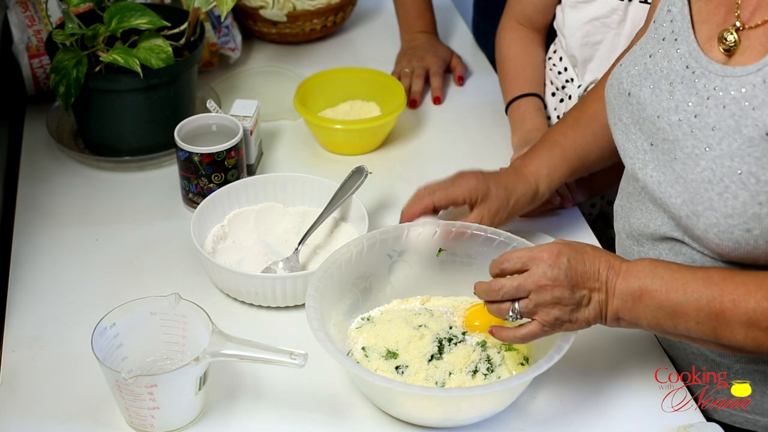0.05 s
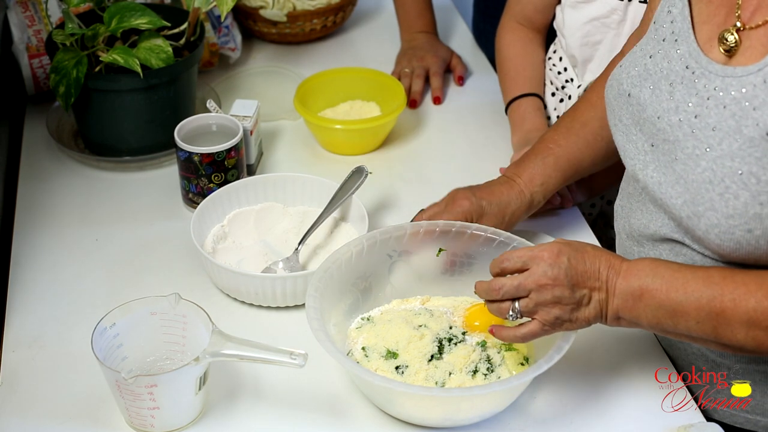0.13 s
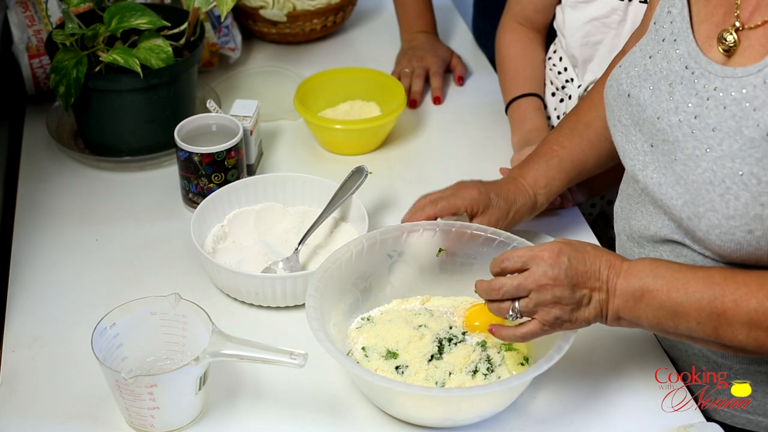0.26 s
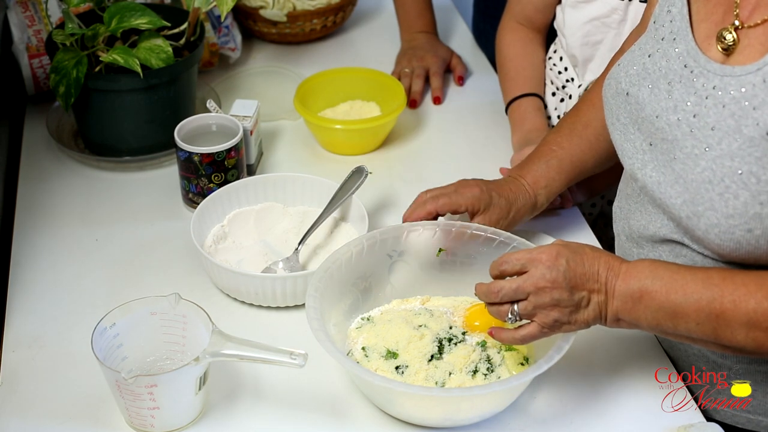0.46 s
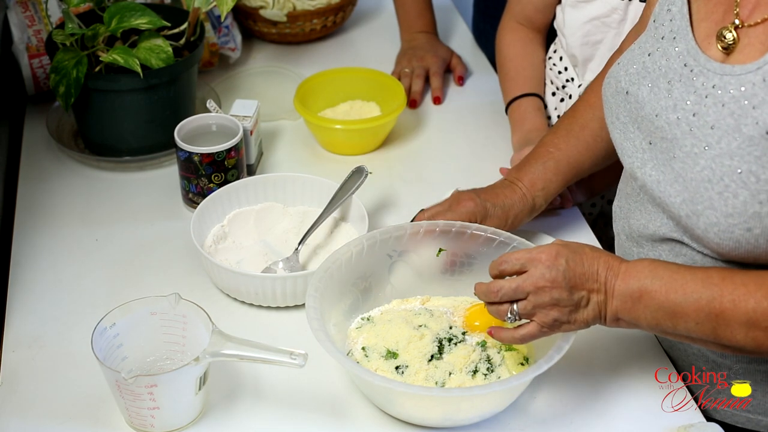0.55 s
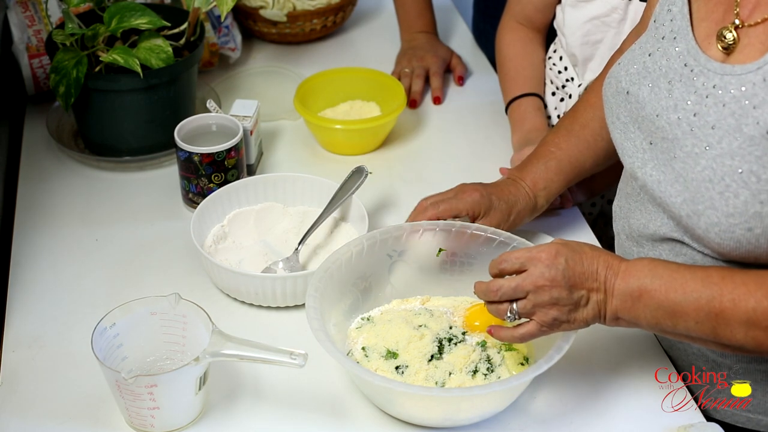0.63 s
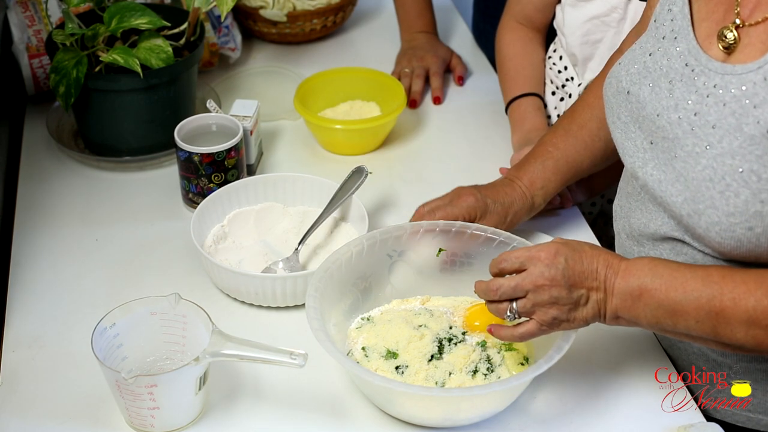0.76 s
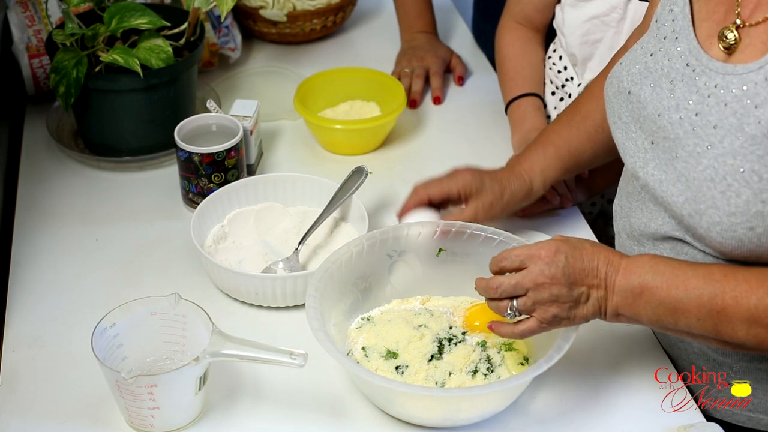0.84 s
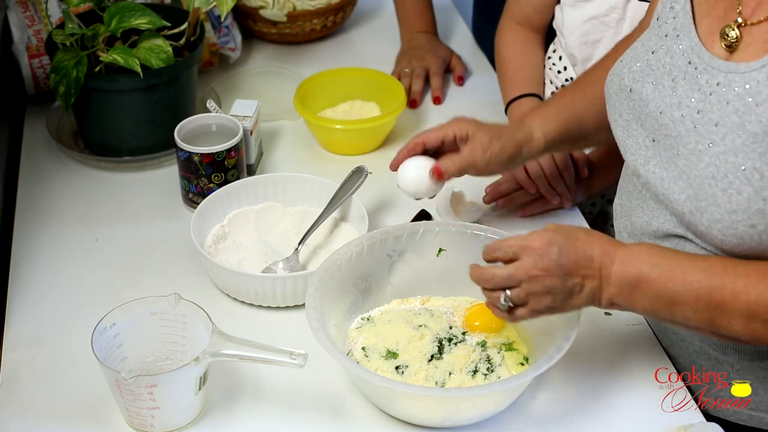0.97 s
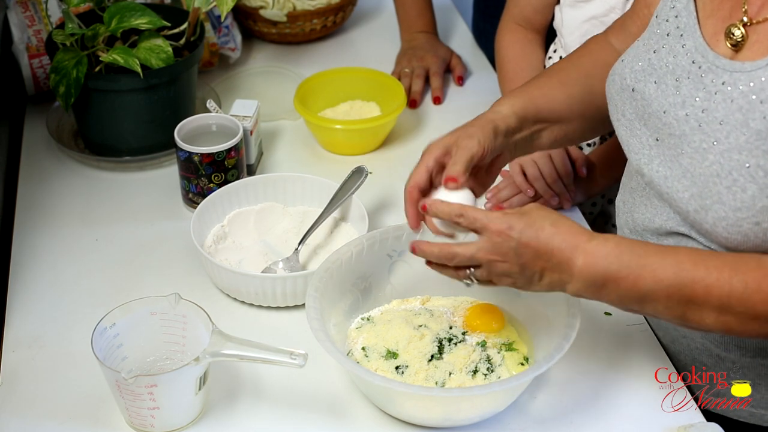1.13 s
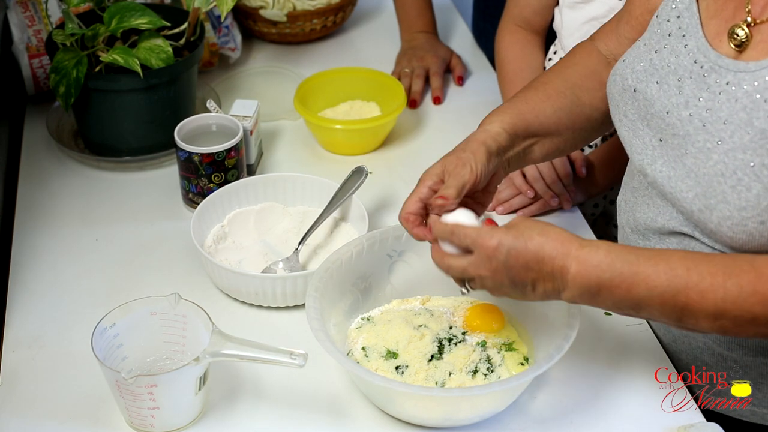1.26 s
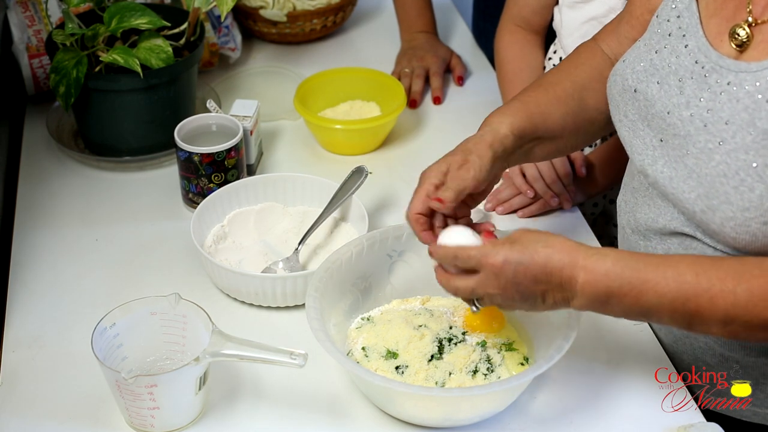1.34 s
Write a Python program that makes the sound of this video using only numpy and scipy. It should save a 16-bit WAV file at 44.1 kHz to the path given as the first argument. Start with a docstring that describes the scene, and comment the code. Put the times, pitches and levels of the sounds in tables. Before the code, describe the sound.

An egg cracks sharply on a hard edge, then three lighter knocks in a quiet kitchen

```python
"""Egg knocked on a hard edge

One sharp crack and three lighter knocks at a kitchen table, over a low room rush with faint hum lines.
Each blow is a few milliseconds of grainy shell noise with a small room's tail, plus decaying sines for
the egg, the ringing edge and the table top; the first also sways the table. Short noise bursts tick as
shell, one before the crack and the rest after the knocks, and a very low sine swells as the hand lifts."""
import sys
import numpy as np
from scipy import signal
from scipy.fft import rfft, irfft, next_fast_len
from scipy.io import wavfile
from scipy.ndimage import uniform_filter1d

SR = 44100
rng = np.random.default_rng(int(sys.argv[2]) if len(sys.argv) > 2 else 0)


def to_wav(sig):
    """Store sig (one row per channel, or 1-D mono) as 16-bit WAV at the path in sys.argv[1].

    Samples outside -1..1 are clipped; the rate is SR.
    """
    pcm = np.clip(np.atleast_2d(sig), -1, 1) * 32767
    pcm = np.round(pcm).astype(np.int16)
    wavfile.write(sys.argv[1], SR, pcm.T)  # frames by channels


N = 61739
T = np.arange(N) / SR   # time in seconds


def from_db(db):
    """Decibels to gain."""
    return 10 ** (np.asarray(db) / 20)


def rms_one(x):
    """Scale to unit rms."""
    return x / np.sqrt(np.mean(x ** 2) + 1e-20)


def at_hz(points, hz):
    """Read a table of (Hz, value) along a log-frequency axis."""
    table_hz, value = np.transpose(points)
    return np.interp(np.log(hz), np.log(table_hz), value)


def since(start):
    """Seconds since a moment, zero before it."""
    return np.maximum(T - start, 0)


def dying(age, t60):
    """Exponential decay that falls 60 dB in t60 seconds."""
    return from_db(-60 * age / t60)


def band_noise(low, high):
    """Noise between two frequencies, rms 1."""
    sos = signal.butter(3, [low, min(high, .45 * SR)], "band", fs=SR, output="sos")
    return rms_one(signal.sosfilt(sos, rng.standard_normal(N)))


def ring(start, hz, t60):
    """One mode struck at a given moment: a sine that dies away exponentially."""
    age = since(start)
    return np.sin(2 * np.pi * hz * age) * dying(age, t60)


MODE_SCATTER_DB, LONGEST_RING_S = 2.5, .26


def struck(modes, start):
    """All modes of a body, alternating in sign, with new strengths for each blow."""
    out = np.zeros(N)
    for k, (hz, db, t60) in enumerate(modes):
        strength = from_db(db + MODE_SCATTER_DB * rng.standard_normal())
        out += (-1) ** k * strength * ring(start, hz, min(t60, LONGEST_RING_S))
    return out


# Spectrum of the room's rush. Each row: frequency in Hz, relative density in dB per Hz.
RUSH_SPECTRUM = [(20, -0.5), (40, -2.5), (91, -6.5), (142, -8), (182, -1.5), (210, -7), (248, -0.5),
                 (340, -5.5), (422, -10.5), (470, -9), (698, -17.5), (949, -19.5), (1300, -22.5),
                 (2000, -31), (3500, -36.5), (5500, -38.5), (9000, -38.5), (16000, -41)]
RUSH_DB = -59   # rms
# Steady hum lines. Each row: frequency in Hz, level in dB rms.
HUM_LINES = [(177.6, -75), (339.1, -69), (463.0, -70.5)]


def room_tone():
    """Steady rush of shaped noise, with a few faint sines as hum."""
    hz = np.maximum(np.fft.rfftfreq(N, 1 / SR), 1)
    spectrum = rfft(rng.standard_normal(N)) * from_db(at_hz(RUSH_SPECTRUM, hz))
    rush = rms_one(irfft(spectrum, N))
    hum = np.zeros(N)
    for line_hz, db in HUM_LINES:
        hum += np.sqrt(2) * from_db(db) * np.sin(2 * np.pi * (line_hz * T + rng.random()))
    return from_db(RUSH_DB) * rush + hum


# Faint snaps of shell.
# Each row: start in seconds, level in dB, centre pitch in Hz, width in octaves, fall to 1/e in seconds.
SHELL_TICKS = [(0.027, -62, 3890, 0.28, 0.0013), (0.992, -64.5, 12000, 0.61, .001),
               (1.035, -55, 8700, 0.53, 0.0031), (1.044, -61.5, 8000, 1.0, 0.0076),
               (1.079, -67.5, 8820, 1.2, 0.0035), (1.185, -55.5, 4450, 0.95, 0.00085),
               (1.231, -63, 9000, .6, 0.0011), (1.2405, -46, 2182, 0.85, 0.0004),
               (1.241, -52, 7530, 0.82, 0.0005), (1.258, -63.5, 2480, 0.84, 0.0012),
               (1.275, -71, 2500, 0.68, 0.0023), (1.3186, -57, 3100, 0.33, 0.0015),
               (1.318, -53.5, 6940, 1.3, 0.00074), (1.326, -56.5, 6600, 0.61, 0.0017)]
TICK_ROOM_DB, TICK_T60_S = -30, 0.18


def shell_ticks():
    """Tiny snaps of shell under the fingers: bursts of band noise, each with a faint room tail."""
    out = np.zeros(N)
    for start, db, hz, octaves, fall in SHELL_TICKS:
        age = since(start)
        room = from_db(TICK_ROOM_DB) * dying(age, TICK_T60_S)
        envelope = (T > start) * (np.exp(-age / fall) + room)
        half_width = 2 ** (octaves / 2)
        out += from_db(db) * envelope * band_noise(hz / half_width, hz * half_width)
    return out


CRUNCH_RISE_S, CRUNCH_HOLD_S, CRUNCH_FALL_S = .0025, .0036, 0.004


def burst(start):
    """Envelope of the shell giving way: rise, hold, fall."""
    rise = np.minimum(since(start) / CRUNCH_RISE_S, 1) ** 2
    return rise * np.exp(-since(start + CRUNCH_HOLD_S) / CRUNCH_FALL_S)


CRUNCH_GRAIN_DB = 2.0
ECHO_S, ECHO_DB = .0065, -5   # the crunch comes back once from a near surface


def crunch_envelope(start, snap_db):
    """Direct sound of the fractures: a grainy burst and its echo, summed in power."""
    wobble = rms_one(uniform_filter1d(rng.standard_normal(N), size=24))   # smoothed over 24 samples
    grain = rms_one(from_db(CRUNCH_GRAIN_DB * np.tanh(wobble)))
    return from_db(snap_db) * grain * np.hypot(burst(start), from_db(ECHO_DB) * burst(start + ECHO_S))


# Centres of the parts of the crack's spectrum. Each entry: frequency in Hz.
CRACK_CENTRES = [160, 300, 700, 1500, 2700, 4500, 8500, 14000]
CRACK_LOW_HZ, SHELL_WIDTH_OCTAVES = 145, 0.099


def crack_spectrum(hz, size, colour, resonances):
    """Spectrum of noise coloured per octave, thinned in the bass and lifted at the shell's resonances."""
    lift_db = np.zeros(len(hz))
    for peak_hz, db in resonances:
        lift_db += db * np.exp(-.5 * (np.log2(hz / peak_hz) / SHELL_WIDTH_OCTAVES) ** 2)
    per_octave = np.sqrt(SR / 2 / np.log(2) / hz)   # equal power in every octave
    bass_cut = np.hypot(1, (CRACK_LOW_HZ / hz) ** 3)
    colour_db = at_hz(list(zip(CRACK_CENTRES, colour)), hz)
    return rfft(rng.standard_normal(size)) * per_octave / bass_cut * from_db(colour_db + lift_db)


# How the crack dies away in the room.
# Each row: band centre in Hz, direct crunch over room in dB before the snap level,
# room t60 in seconds before the knock's tail factor.
CRACK_BANDS = [(199, -3, 0.22), (680, -3.5, 0.19), (1690, -6.5, 0.21), (4500, -2.5, 0.17), (9000, 1.5, .17),
               (15000, -0.5, .145)]
ROOM_BUILD_S, LATE_DB, LATE_T60_S = 0.014, -25.5, 0.43


def crack(start, snap_db, tail, colour, resonances):
    """A grainy burst of fractures, then the room's diffuse answer building up and dying band by band."""
    size = next_fast_len(N)
    hz = np.maximum(np.fft.rfftfreq(size, 1 / SR), 1)
    age = since(start)
    noise = crack_spectrum(hz, size, colour, resonances)
    crunch = crunch_envelope(start, snap_db)
    build = 1 - np.exp(-age / ROOM_BUILD_S)
    late = from_db(LATE_DB) * dying(age, LATE_T60_S)
    centres = [row[0] for row in CRACK_BANDS]
    out = np.zeros(N)
    # each band's share is 1 at its own centre and fades to 0 at its neighbours
    for share, (_, crunch_db, t60) in zip(np.eye(len(CRACK_BANDS)), CRACK_BANDS):
        band = irfft(noise * at_hz(list(zip(centres, share)), hz), size)[:N]
        room = build * (dying(age, t60 * tail) + late)
        out += band * np.hypot(from_db(crunch_db) * crunch, room)
    return out


# The four blows, also played by the egg, edge and table below.
# Each row: start in seconds, table thump in dB, edge ring in dB, snap level in dB, tail length as a
# factor, then the crack's level in dB per octave at each of CRACK_CENTRES.
BLOWS = [ (0.2099, -23, -39, -1.2, 1.03, -29.5, -37, -27, -19, -21.5, -26.5, -21.5, -28.5),
         (0.4125, -26, -54.5, 2.2, 0.9, -41, -37.5, -37.5, -44.5, -44.5, -40, -38, -44.5),
         (0.6296, -29.5, -55, 1.3, 0.86, -50.5, -36.5, -39, -39.5, -41.5, -38.5, -36, -40.5),
         (0.8147, -33, -68, 1.2, 1.014, -78, -43, -53.5, -48.5, -53, -48.5, -50, -56)]
# The shell's resonances shift as it breaks.
# Each row: one blow, as four pairs of frequency in Hz and lift in dB.
SHELL_RESONANCES = [
    [(1340, 2.5), (1760, 4), (2880, 4), (3380, 0)],
    [(455, 0), (1520, 13), (1930, 15), (3370, 9.5)],
    [(600, 9.5), (830, 8.5), (1300, 9.5), (2340, 8)],
    [(450, 15), (810, 12), (2020, 0.5), (4560, 1)],
]


def shell_cracks():
    """The shell fractures at each blow, with its own colour and resonances."""
    out = np.zeros(N)
    for (start, _, _, snap_db, tail, *colour), resonances in zip(BLOWS, SHELL_RESONANCES):
        out += crack(start, snap_db, tail, colour, resonances)
    return out


SWAY_HZ, SWAY_T60_S, SWAY_DB = 32.4, .11, -14.5


def table_sway():
    """Only the first, hardest blow sways the whole table: one low damped sine."""
    return from_db(SWAY_DB) * ring(BLOWS[0][0], SWAY_HZ, SWAY_T60_S)


# The egg's own dull, quickly damped modes.
# Each row: frequency in Hz, relative level in dB before scatter, t60 in seconds.
EGG_MODES = [(367, -6.5, 0.062), (527, 0, 0.051), (820, 1, 0.039)]
# Strength of the egg's knock. Each entry: one blow in dB.
EGG_STRENGTHS = [-31, -46.5, -35, -45.5]


def egg_body():
    """The hollow knock of the egg itself, halfway up the crunch's rise."""
    out = np.zeros(N)
    for (start, *_), db in zip(BLOWS, EGG_STRENGTHS):
        out += from_db(db) * struck(EGG_MODES, start + CRUNCH_RISE_S / 2)
    return out


# Modes of the struck edge.
# Each row: frequency in Hz, relative level in dB before scatter, t60 in seconds before the ring cap.
EDGE_MODES = [(680, 0, 0.36), (764.5, 2, 0.25), (969.5, -8, 0.083), (1292, 5.5, 0.34), (1393, 2.5, 0.78),
              (1423, -8.5, 0.5), (1592, -6, 0.22), (1750, -4, 0.07), (2186, 0, 0.54), (2250, -6.5, 0.05),
              (2450, -7, 0.39), (2850, -1, 0.28), (3030, -9.5, 0.21), (3350, -15.5, 0.18)]


def edge_ring():
    """The hard edge rings in many modes once the crunch has risen."""
    out = np.zeros(N)
    for start, _, ring_db, *_ in BLOWS:
        out += from_db(ring_db) * struck(EDGE_MODES, start + CRUNCH_RISE_S)
    return out


# Modes of the table top.
# Each row: frequency in Hz, relative level in dB before scatter, t60 in seconds before the ring cap.
TABLE_MODES = [(72.5, -8.5, 0.25), (101.6, 5, 0.045), (130.4, 0.5, 0.19), (232.3, -15, 0.36),
               (277, -16.5, 0.05), (334.6, -14.5, 0.11), (457, -20.5, .14), (493.5, -21.5, 0.19)]
THUMP_LAG_S = 0.00366


def table_thump():
    """The table top booms in its low modes a moment after the edge."""
    out = np.zeros(N)
    for start, thump_db, *_ in BLOWS:
        out += from_db(thump_db) * struck(TABLE_MODES, start + THUMP_LAG_S)
    return out


RUMBLE_AT_S, RUMBLE_HALF_LENGTH_S = 1.035, .065   # swell centre, time from there to 1/e
RUMBLE_HZ, RUMBLE_DB = 30.3, -47.5


def rumble():
    """A short, soft, very low swell as the hand lifts: a sine under a bell-shaped envelope."""
    swell = np.exp(-((T - RUMBLE_AT_S) / RUMBLE_HALF_LENGTH_S) ** 2)
    return from_db(RUMBLE_DB) * swell * np.sin(2 * np.pi * (RUMBLE_HZ * T + rng.random()))


def scene():
    """Everything summed to one channel."""
    background = room_tone() + shell_ticks() + rumble()
    blows = shell_cracks() + table_sway() + egg_body() + edge_ring() + table_thump()
    return (background + blows)[None]


LOW_CUT_HZ, CUTOFF_HZ = 6, 15800


def record(dry):
    """The deepest bass is rolled off and the top is cut steeply."""
    low_cut = signal.butter(2, LOW_CUT_HZ, "high", fs=SR, output="sos")
    top_cut = signal.ellip(10, .2, 80, CUTOFF_HZ, fs=SR, output="sos")   # .2 dB ripple, 80 dB down
    return signal.sosfilt(top_cut, signal.sosfilt(low_cut, dry))


dry = scene()
out = record(dry)
to_wav(out)
```